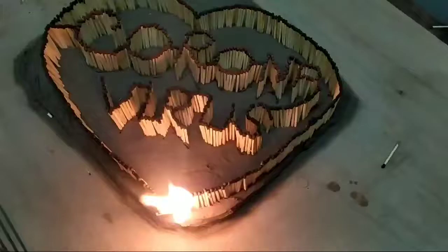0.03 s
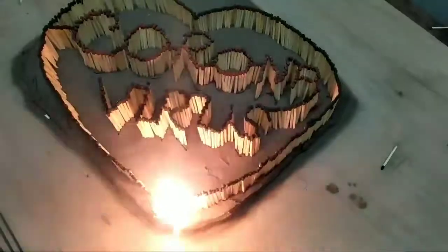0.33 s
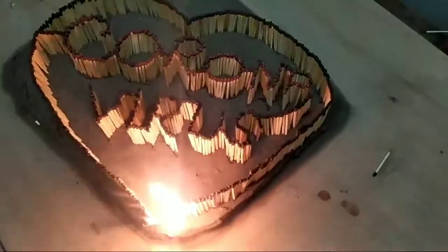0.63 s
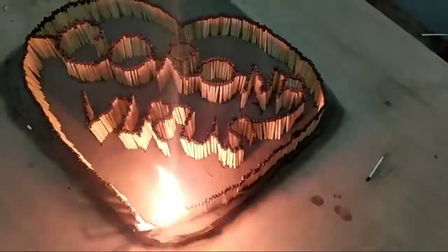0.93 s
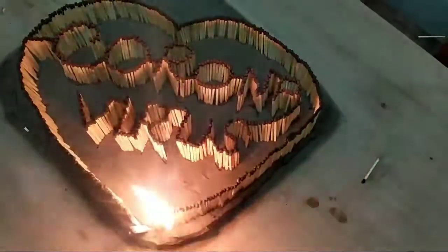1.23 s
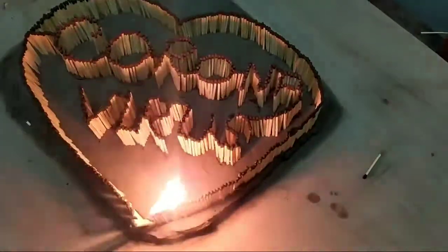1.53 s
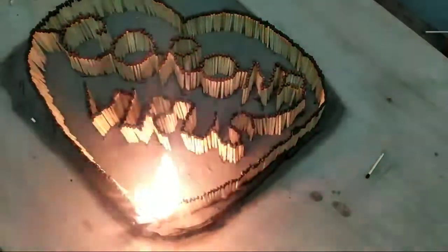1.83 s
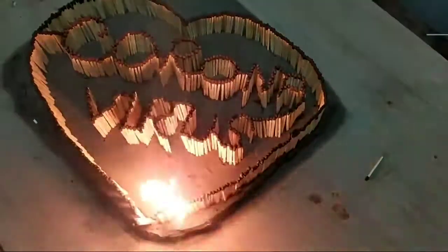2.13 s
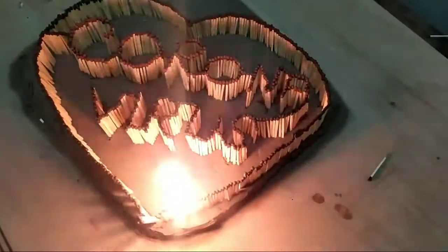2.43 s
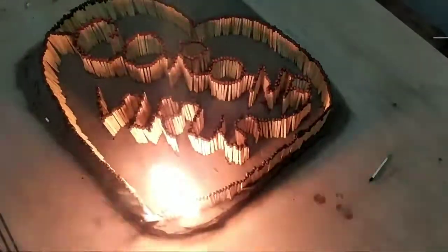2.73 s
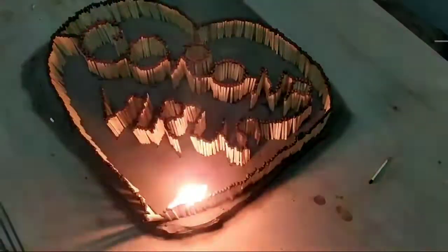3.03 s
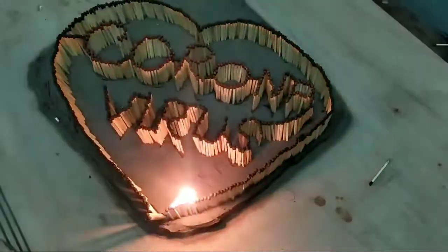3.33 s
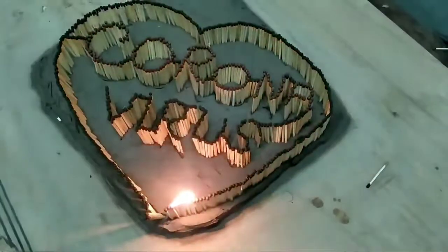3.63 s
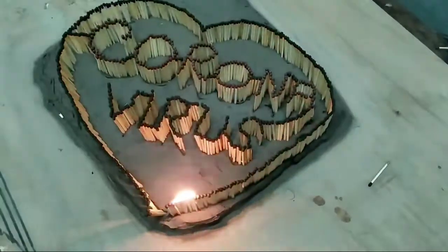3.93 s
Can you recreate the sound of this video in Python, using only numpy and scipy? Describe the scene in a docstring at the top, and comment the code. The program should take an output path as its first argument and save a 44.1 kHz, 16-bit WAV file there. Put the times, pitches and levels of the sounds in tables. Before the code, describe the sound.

Burning match heads flare and sizzle softly indoors, over a distant motor hum and faint horns.

```python
"""Matches burning indoors

A row of matches burns close by on a floor. Each head that catches flares with a soft,
fizzing hiss of gas jets and tiny bursts; late on the flame dies down. Behind it are the
rumble and air of the room, a distant motor's hum and two faint toots of far-off vehicle horns."""
import sys
import numpy as np
from scipy import signal
from scipy.fft import rfft, irfft
from scipy.io import wavfile
from scipy.ndimage import uniform_filter1d

SR = 44100
rng = np.random.default_rng(int(sys.argv[2]) if len(sys.argv) > 2 else 0)


def wav_out(sig):
    """Save sig, one row per channel (or a flat mono array), as 16-bit PCM at SR to the path in sys.argv[1]."""
    wavfile.write(sys.argv[1], SR, np.round(np.clip(np.atleast_2d(sig).T, -1, 1) * 32767).astype(np.int16))


N = 176400
T = np.arange(N) / SR
HZ = np.fft.rfftfreq(N, 1 / SR)


def flame(sputter_db=1.5, sputter_hz=30):
    """Burning match heads: hiss and sizzle sputter together."""
    return (hiss() + sizzle()) * amp(sputter_db * wander(sputter_hz))


# Steady burning between flares (time [s], level [dB])
BURN_LEVEL = [(0.25, -2), (0.9, -8.5), (1.4, -4), (1.62, -5.5), (2.15, -5), (2.9, -3.5), (3.25, -9),
              (4, -28)]
# Heads catching (start [s], rise [s], hold [s], hiss [dB], sizzle [dB])
HEAD_FLARES = [(.24, 0.055, 0.3, -7.5, -2), (0.65, 0.024, .02, -5, -9), (1.023, 0.064, 0.2, -1, -2),
               (1.707, 0.082, 0.19, -1, 2), (2.22, 0.1, 0.15, -8, -10), (2.626, 0.093, 0.046, 1.5, 1)]
# Hiss spectrum (frequency [Hz], left [dB], right [dB])
HISS_SPECTRUM = [(300, -94, -88.5), (865, -79.5, -77.5), (2000, -86.5, -85.5), (3000, -95, -87),
                 (4340, -85, -83), (5970, -86, -97.5), (7160, -81.5, -88), (8650, -85, -88),
                 (10300, -84, -88), (11600, -87.5, -89), (13000, -84.5, -96), (14100, -88.5, -104),
                 (15400, -96, -104)]

def hiss(fade_s=0.085, fizz_db=-14):
    """Gas jets and tiny bursts follow the burning and surge as each head catches."""
    power = level(BURN_LEVEL) ** 2
    for start, rise, hold, db, _ in HEAD_FLARES:
        power += (amp(db) * swell(start, rise, hold, fade_s)) ** 2
    bursts = amp(fizz_db) * fizz()
    jets = patchy(rng.standard_normal((2, N)))
    return colour(jets + bursts, HISS_SPECTRUM) * np.sqrt(power)


def fizz(bursts_per_s=640, spread_db=4):
    """Tiny bursts in the flame, random in time and size."""
    sizes = amp(spread_db * np.minimum(rng.exponential(1, N), 4))
    onsets = rng.random(N) < bursts_per_s / SR
    return unit_rms(sizes * onsets * rng.standard_normal((2, N)))


# Sizzle spectrum (frequency [Hz], left [dB], right [dB])
SIZZLE_SPECTRUM = [(9000, -120, -125), (12400, -94, -104), (13300, -84.5, -97), (14200, -81, -105),
                   (15400, -88, -98)]

def sizzle(fade_s=0.06):
    """Each flaring head adds a high sizzle."""
    envelope = sum(amp(db) * swell(start, rise, hold, fade_s) for start, rise, hold, _, db in HEAD_FLARES)
    return colour(patchy(rng.standard_normal((2, N))), SIZZLE_SPECTRUM) * envelope


# Flame spits (start [s], hold [s], level [dB])
SPIT_EVENTS = [(0.295, 0.013, 1.5), (0.692, .002, -4), (1.842, .004, -1)]
# Spit spectrum (frequency [Hz], level [dB])
SPIT_SPECTRUM = [(1000, -87), (3400, -84), (4200, -73), (5500, -92), (7100, -79), (8200, -92), (9300, -82),
                 (11000, -94), (15000, -105)]

def spits(rise_s=0.0025, fade_s=0.006, right_db=-4):
    """Short puffs as a head bursts alight."""
    envelope = sum(amp(db) * swell(start, rise_s, hold, fade_s) for start, hold, db in SPIT_EVENTS)
    return colour(rng.standard_normal((2, N)), SPIT_SPECTRUM) * envelope * amp([[0], [right_db]])


# Deep rumble, low drone, hollow body of the room noise (frequency [Hz], level [dB])
RUMBLE_SPECTRUM = [(20, -94), (30, -84), (42, -73), (58, -54.5), (76, -60), (87, -56.5), (96, -56.5),
                   (105, -56.5), (124, -74.5), (160, -88), (400, -110)]
DRONE_SPECTRUM = [(60, -96), (122, -68.5), (137, -60.5), (148, -57), (160, -63.5), (182, -71.5),
                  (260, -81.5), (600, -110)]
BODY_SPECTRUM = [(100, -83), (190, -71), (235, -68), (310, -73.5), (400, -83.5), (470, -82.5), (800, -97.5),
                 (2000, -120)]
# Low band levels (time [s], rumble [dB], drone [dB], body [dB])
BAND_LEVELS = [(0.25, -17.5, -3.5, -8), (0.46, -5.5, -6.5, -0.5), (0.68, -3, -3, 0.5), (1.2, -4, 1.5, -1.5),
               (1.8, -5.5, -0.5, -3.5), (2.15, 0, 1.5, -0.5), (2.6, 0.5, -0.5, 1.5), (3.0, 1, 2.5, 1.5),
               (3.45, 1, -3, 3.5), (3.85, 1.5, 2.5, 4)]
# Room air (frequency [Hz], left [dB/Hz], right [dB/Hz])
AIR_SPECTRUM = [(100, -90, -97), (304, -78, -77.5), (496, -77, -78.5), (597, -76, -74), (760, -79.5, -77.5),
                (940, -75, -75), (1480, -82.5, -80), (1900, -79.5, -79.5), (2530, -78.5, -83),
                (3640, -82.5, -88), (5200, -87.5, -90), (6420, -82.5, -90), (7630, -82, -89),
                (9000, -88.5, -89.5), (11250, -94, -93.5), (14600, -103, -104)]

def room():
    """Three slowly swelling bands of low noise under steady air."""
    bands = (RUMBLE_SPECTRUM, DRONE_SPECTRUM, BODY_SPECTRUM)
    low = sum(colour(diffuse(), band) * level(BAND_LEVELS, k) for k, band in enumerate(bands, 1))
    return low + colour(diffuse(), AIR_SPECTRUM)


# Air rush spectrum (frequency [Hz], level [dB])
RUSH_SPECTRUM = [(200, -104), (350, -81), (520, -84), (650, -72), (800, -81), (1000, -84), (1240, -74),
                 (1500, -105)]

def air_rush():
    """One brief rush of air at the start."""
    return colour(diffuse(), RUSH_SPECTRUM) * swell(start_s=0.31, rise_s=0.024, hold_s=0.1, fade_s=0.07)


# Left-right likeness of room noise (frequency [Hz], correlation [-1..1])
ROOM_CORRELATION = [(60, 0.99), (130, 0.95), (290, 0.89), (640, 0.5), (1400, -0.27), (3090, -0.0044),
                    (6780, -0.035), (14900, -0.15)]

def diffuse():
    """White noise from all around: alike on both sides in the bass only."""
    left, independent = rfft(rng.standard_normal((2, N)))
    correlation = np.clip(spectrum(ROOM_CORRELATION)[0], -1, 1)
    right = correlation * left + np.sqrt(1 - correlation ** 2) * independent
    return irfft(np.array([left, right]), N)


# Motor tones (multiple of turning rate [x], left [dB], right [dB])
MOTOR_TONES = [(2.002, -40, -42.5), (4.008, -59.5, -46.5), (4.94, -56, -59), (5.984, -51.5, -52),
               (7.026, -54.5, -54.5), (7.99, -62, -61.5), (8.96, -71, -75), (10.245, -62, -61.5),
               (16.01, -58, -62.5), (17.12, -64, -72), (18.45, -65, -70), (20.98, -66.5, -58.5),
               (26.28, -76, -63)]
# Throb of the lowest tone (time [s], level [dB])
THROB_LEVEL = [(0.25, -5), (0.5, -8), (0.66, 3.5), (1.6, -2.5), (2.5, 5), (3.1, -5), (4, -0.5)]

def motor(turning_hz=42.34, drift=0.0019, drift_hz=1.88, flutter_depth=0.42, flutter_hz=5.3):
    """Multiples of one turning rate, each fluttering by itself; the lowest slowly throbs."""
    turns = np.cumsum(turning_hz * (1 + drift * wander(drift_hz))) / SR
    out = np.zeros((2, N))
    for k, (multiple, left_db, right_db) in enumerate(MOTOR_TONES):
        tone = flutter(flutter_depth, flutter_hz) * np.exp(2j * np.pi * (multiple * turns + rng.random()))
        throb = level(THROB_LEVEL) if k == 0 else 1
        out += amp([[left_db], [right_db]]) * unit_rms(tone.real) * throb
    return out


# Toots (start [s], rise [s], hold [s], fade [s], pitch [Hz], level [dB])
HORN_TOOTS = [(0.358, 0.093, 0.13, .35, 418.3, -55.5), (3.2, 0.27, .55, .3, 467.7, -52.5)]
# Horn harmonics at a distance (frequency [Hz], level [dB])
HORN_SPECTRUM = [(2100, -21), (2330, -8), (2520, -13), (2800, -2), (2950, 0), (3250, -7.5), (3360, 4.5),
                 (3750, -19), (4200, -13)]

def horns(waver=0.0041, blur_depth=1.8, flutter_hz=31.8, right_db=-3.5):
    """Far-off buzzing horns: only harmonics near their resonance arrive, blurred on the way."""
    out = np.zeros((2, N))
    tone_hz, tone_db = np.transpose(HORN_SPECTRUM)
    for start, rise, hold, fade, pitch_hz, db in HORN_TOOTS:
        envelope = swell(start, rise, hold, fade)
        cycles = np.cumsum(pitch_hz * (1 + waver * wander(flutter_hz))) / SR
        for harmonic in range(5, 10):
            blur = np.array([flutter(blur_depth, flutter_hz) for side in range(2)])
            tone = unit_rms((blur * np.exp(2j * np.pi * harmonic * cycles)).real)
            out += amp(db + np.interp(harmonic * pitch_hz, tone_hz, tone_db)) * envelope * tone
    return out * amp([[0], [right_db]])


def patchy(x, depth_db=3.5, width_hz=700):
    """Neighbouring bands of a hiss flicker independently."""
    frames = signal.stft(x, nperseg=512)[2]
    flicker = uniform_filter1d(rng.standard_normal(frames.shape), round(width_hz * 512 / SR), axis=1)
    flicker = unit_rms(uniform_filter1d(flicker, size=9, axis=2))  # smooth in time
    return unit_rms(signal.istft(frames * amp(depth_db * flicker), nperseg=512)[1][:, :N])


def flutter(depth, rate_hz):
    """Complex gain that shakes a tone's level and phase."""
    return 1 + depth * (wander(rate_hz) + 1j * wander(rate_hz))


def wander(rate_hz):
    """Random motion of rms 1, up to about the given rate."""
    lowpass = np.exp(-(HZ / rate_hz) ** 2) * (HZ > 0)
    return unit_rms(irfft(rfft(rng.standard_normal(N)) * lowpass, N))


def swell(start_s, rise_s, hold_s, fade_s):
    """Linear rise, hold, exponential decay."""
    attack = np.clip((T - start_s) / rise_s, 0, 1)
    return attack * np.exp(-np.maximum(T - start_s - rise_s - hold_s, 0) / fade_s)


def colour(x, table):
    """Shapes white noise of rms 1 to a table read as dB/Hz."""
    return irfft(rfft(x) * amp(spectrum(table)) * np.sqrt(SR / 2), N)


def spectrum(table):
    """Table columns interpolated over log frequency."""
    hz, *columns = np.transpose(table)
    return np.array([np.interp(np.log(HZ + 1), np.log(hz), c) for c in columns])


def level(curve, column=1):
    """One dB column of a time curve as gain per sample."""
    columns = np.transpose(curve)
    return amp(np.interp(T, columns[0], columns[column]))


def amp(db):
    """Decibels to gain."""
    return 10 ** (np.asarray(db) / 20)


def unit_rms(x):
    """Scales to rms 1."""
    return x / np.sqrt(np.mean(abs(x) ** 2) + 1e-20)


def scene():
    """Burning matches in front of the room's background."""
    background = room() + air_rush() + motor()
    return flame() + spits() + background + horns()


def record(dry):
    """Brief silence, a quick fade-in and a low-pass."""
    start_s, rise_s, cutoff_hz = 0.22, 0.067, 15480
    fade_in = np.clip((T - start_s) / rise_s, 0, 1) ** 1.52
    lowpass = signal.firwin(801, cutoff_hz, window=("kaiser", 9), fs=SR)
    return signal.oaconvolve(dry * fade_in, lowpass[None], "same")


dry = scene()
out = record(dry)
wav_out(out)
```